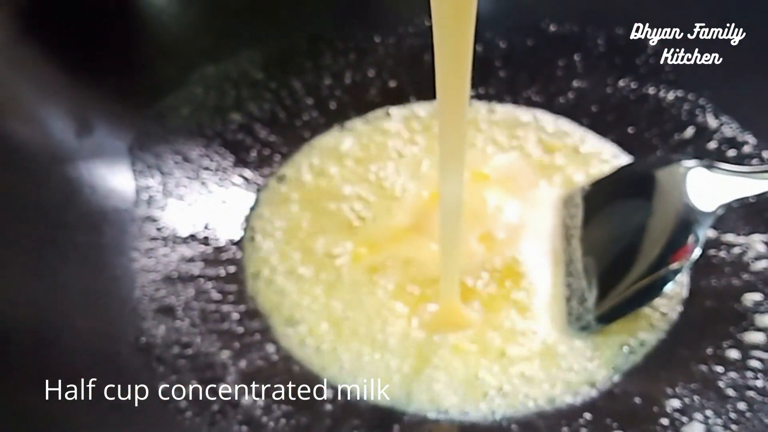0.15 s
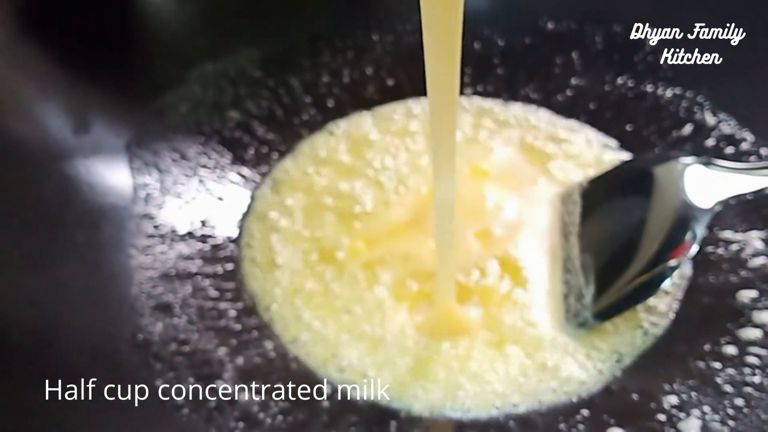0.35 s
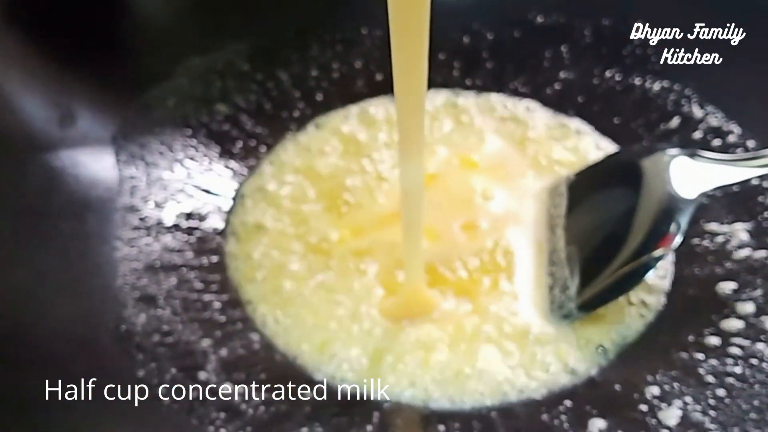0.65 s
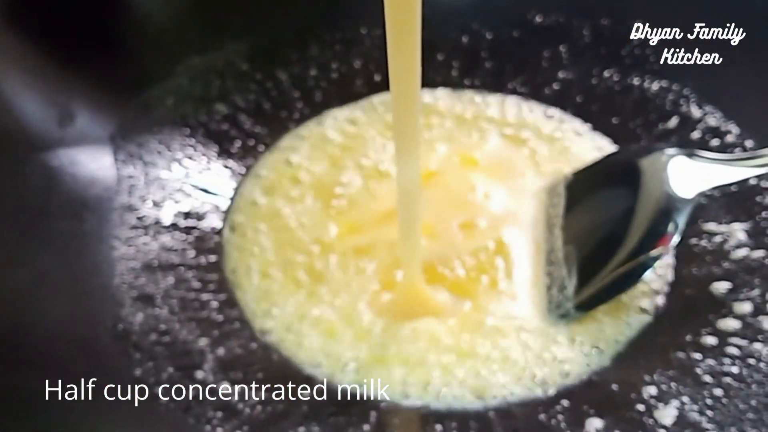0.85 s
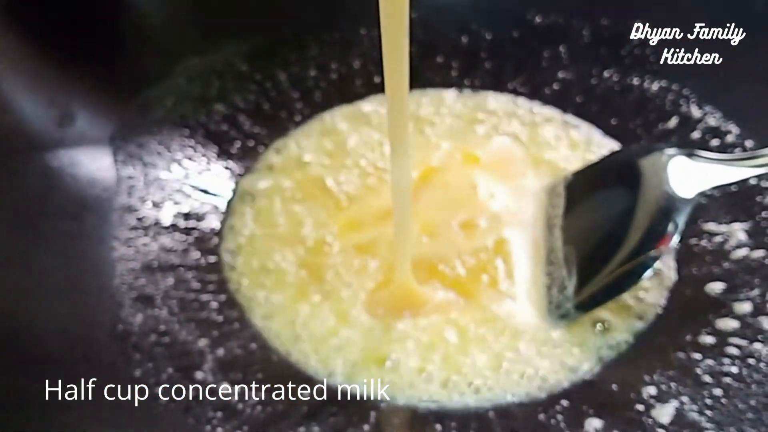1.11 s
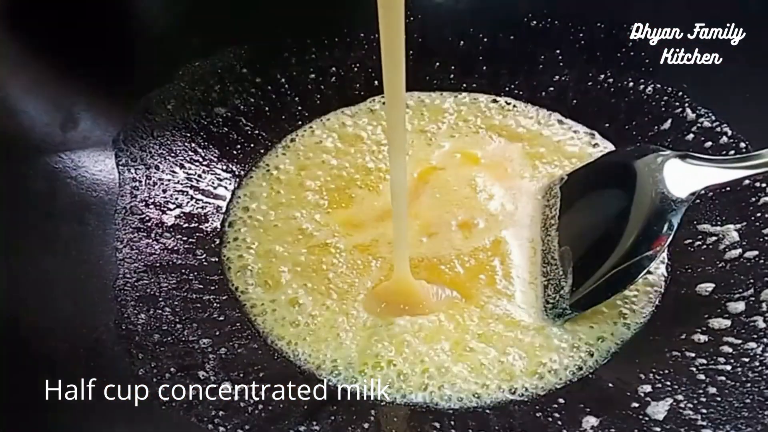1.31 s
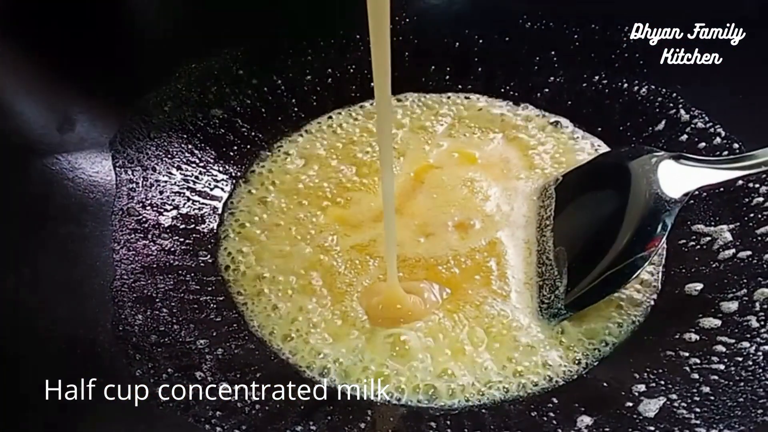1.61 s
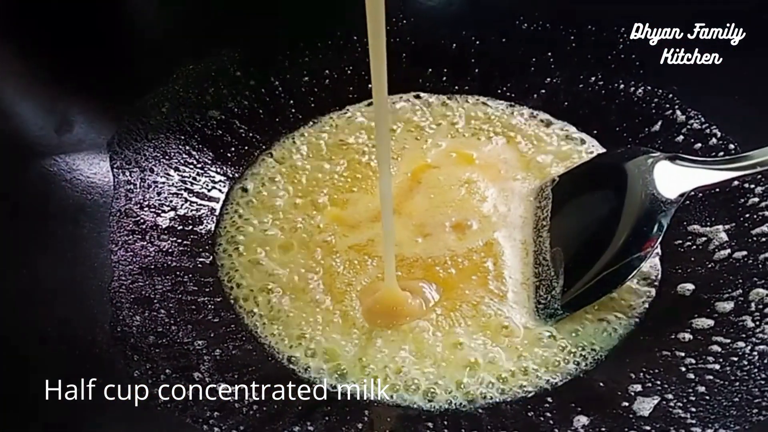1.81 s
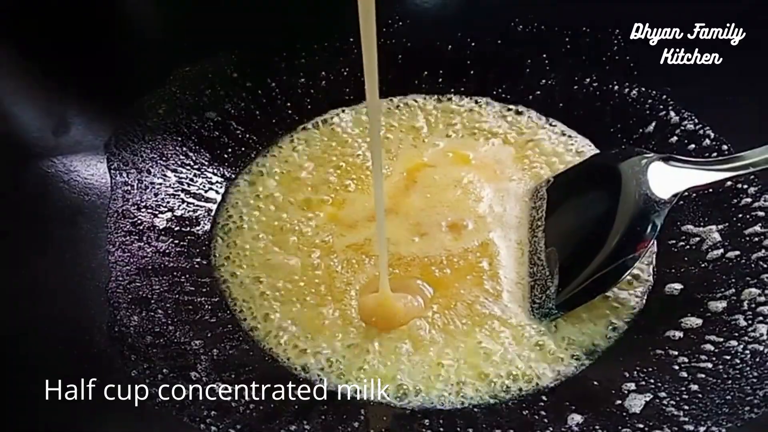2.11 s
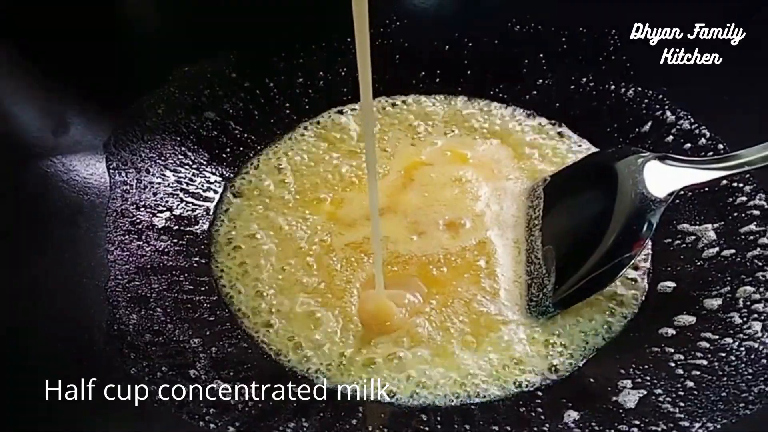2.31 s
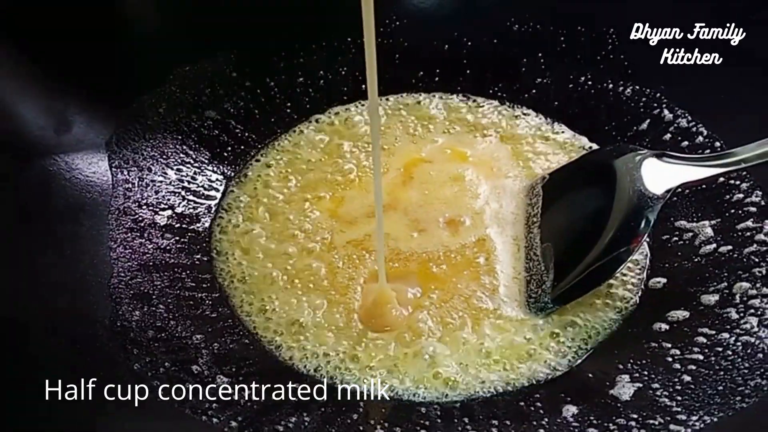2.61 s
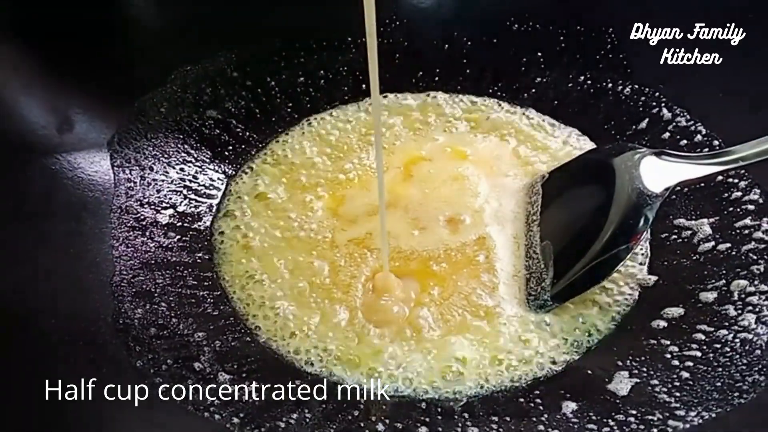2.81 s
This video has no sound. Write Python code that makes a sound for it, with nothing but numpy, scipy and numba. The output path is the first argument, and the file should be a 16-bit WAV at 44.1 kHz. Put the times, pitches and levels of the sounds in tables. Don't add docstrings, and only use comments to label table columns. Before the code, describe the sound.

Sizzling of foaming butter in a hot pan, fine fizzing hiss with sharp little pops

```python
import sys
import numpy as np
from scipy import signal
from scipy.fft import rfft, irfft, next_fast_len
from scipy.io import wavfile
from scipy.ndimage import uniform_filter1d
from numba import njit

SR = 44100
rng = np.random.default_rng(int(sys.argv[2]) if len(sys.argv) > 2 else 0)


def store_pcm(level_fs):
    pcm = np.round(np.clip(level_fs, -1, 1) * 32767).astype(np.int16)
    wavfile.write(sys.argv[1], SR, np.atleast_2d(pcm).T)


def attenuation_scalar(level_db):
    decades = np.asarray(level_db, float) / 20
    return 10 ** decades


N = 130095


def unit(x):
    return x / np.sqrt(np.mean(x ** 2))


def curve(table, hz):
    points = np.array(table, float)
    return np.interp(np.log(np.maximum(hz, 1)), np.log(points[:, 0]), points[:, 1])


def shape(x, gain):
    size = next_fast_len(N + 4096)
    hz = np.arange(size // 2 + 1) * SR / size
    return irfft(rfft(x, size) * gain(hz), size)[..., :N]


def walk(rate_hz):
    hold = max(int(SR / rate_hz), 2)
    steps = rng.standard_normal(N // 64 + 1)[np.arange(N) // hold]
    return unit(uniform_filter1d(steps, hold))


@njit
def ring(at, hz, cycles, size, phase, glide, count):
    out = np.zeros(count)
    for g in range(len(at)):
        tau = cycles[g] * SR / hz[g] / 2
        start, p = int(at[g] * SR - 1.6 * tau), phase[g]
        for k in range(int(5 * tau)):
            x = k / tau - 1.6
            p += 2 * np.pi * min(hz[g] * (1 + glide * x) / SR, .45)
            if 0 <= start + k < count:
                fade = 2 if x < 0 else 1 / (.6 + .5 * x)
                out[start + k] += size[g] * np.exp(-x * x * fade) * np.sin(p)
    return out


def paths(at, hz, cycles, size):
    echo_s, echo_smear, glide = .004, 2.2, .031
    u = rng.random((len(at), 5)).T
    smear = [1, echo_smear, echo_smear]
    late = [0, -echo_s * np.log(1 - u[3]), -echo_s * np.log(1 - u[4])]
    out = []
    for k in range(3):
        strength = size / np.sqrt(smear[k])
        out.append(ring(at + late[k], hz, cycles * smear[k] + 0 * hz, strength, 2 * np.pi * u[k], glide, N))
    return np.array(out)


# (time [s], level [dB])
HEAT = [(0, -41), (.34, -40.5), (.55, -38), (1.02, -35), (1.3, -35.5), (1.42, -38.5), (1.6, -35),
        (1.71, -35), (2.16, -35), (2.55, -35), (2.95, -34.5)]


def heat_db(t):
    return np.interp(t, *np.array(HEAT).T)


def heat_tilt_db(heat, octave):
    return 0.37 * octave * (heat - heat.max())


# (time [s], rise [dB], length [s], pitch [Hz])
SPURTS = [(0.034, -11, 0.052, 1670), (0.098, 6, 0.073, 9350), (0.145, 3.5, 0.082, 1720),
          (0.165, -5.5, 0.052, 9500), (0.225, 5.9, 0.028, 2410), (0.339, 5, 0.06, 2950),
          (0.363, 11, 0.045, 11400), (0.515, 8.5, 0.028, 9100), (0.588, 3.5, 0.092, 5900),
          (0.59, 4, 0.24, 1670), (0.673, -8, 0.035, 2970), (0.7, 9, 0.018, 11100),
          (0.746, -11, 0.011, 15000), (0.773, 5.5, 0.013, 7600), (0.774, 2.5, 0.14, 3400),
          (0.864, 11, 0.011, 11500), (0.887, -5, 0.06, 1740), (0.919, 8, 0.026, 8200),
          (1.027, 4, 0.043, 1700), (1.083, 2, 0.15, 6400), (1.241, 4.5, 0.037, 6300),
          (1.415, -7.5, 0.12, 2360), (1.416, -4, 0.012, 7600), (1.498, 1.5, 0.027, 12400),
          (1.511, 1, 0.028, 4270), (1.517, 6, 0.076, 2010), (1.567, -5, 0.02, 1980),
          (1.597, 12.5, 0.0067, 2420), (1.627, -20, 0.0084, 11100), (1.66, 12, 0.078, 1880),
          (1.69, 3, 0.067, 5300), (1.697, 6, 0.096, 11700), (2.005, -12, 0.027, 4230),
          (2.105, 11, 0.017, 9500), (2.135, -23, 0.0067, 5470), (2.226, -5, 0.049, 8060),
          (2.247, -3.5, 0.11, 3540), (2.305, 7, 0.038, 3600), (2.367, 12, 0.031, 1910),
          (2.38, 5, 0.1, 11400), (2.5, 7.5, 0.033, 11600), (2.519, 5, 0.038, 4900), (2.54, 10, 0.12, 1666),
          (2.644, 4, 0.038, 1700), (2.745, 6, 0.094, 2230), (2.902, -21.5, 0.014, 9100)]


def spurt_db(t, hz):
    share, width_octaves = 0.96, 0.57
    total = 0
    for start, db, length, centre in SPURTS:
        in_time = ((t - start) / (.5 * length)) ** 2
        in_pitch = (np.log2(hz / centre) / width_octaves) ** 2
        total = total + db * np.exp(-in_time - in_pitch)
    return share * total


def steam(heat):
    t, noise = np.arange(0, N, 32) / SR, rng.standard_normal((3, N))
    out = 0
    for hz in 1200 * 2 ** np.arange(0, 4, .5):
        db = np.repeat(spurt_db(t, hz), 32)[:N] + heat_tilt_db(heat, np.log2(hz / 7000))
        band = shape(noise, lambda f: np.clip(1 - 2 * np.abs(np.log2(f / hz + 1e-9)), 0, 1))
        out = out + attenuation_scalar(db) * band
    return attenuation_scalar(-6.5) * out


def foam():
    bubbles, cycles, level_db = 36000, 3.2, 4.5
    scatter_db, scatter_tilt_db, biggest = 3.6, .9, 3.6
    u = rng.random((bubbles, 3)).T
    at, hz = u[0] * N / SR, 1200 + 14800 * u[1]
    octave, i = np.log2(hz / 7000), (u[0] * N).astype(int)
    zones = np.array([walk(44.92) for _ in range(8)])
    shared = 1.57 * walk(60.2)
    heat = heat_db(np.arange(N) / SR)
    db = np.minimum(-np.log(1 - u[2]), biggest) * (scatter_db + scatter_tilt_db * octave)
    db = db + shared[i] + 2 * zones[(u[1] * 8).astype(int), i]
    db = db + spurt_db(at, hz) + 0.37 * octave * (heat - heat.max())[i]
    fizz = paths(at, hz, cycles, attenuation_scalar(db) * np.sqrt(hz))
    return (unit(fizz) + steam(heat)) * attenuation_scalar(level_db + heat)


# (pitch [Hz], level [dB per Hz])
KITCHEN = [(40, -14.5), (270, -7), (334, -7.5), (467, -9), (1060, -7), (1160, -11.5), (1500, -1.5),
           (1950, -24.5), (3300, -120)]


def kitchen():
    level_db, patchy_db, patch_s = -60.5, 5.5, .03
    out = np.zeros((2, N))
    for port in range(2):
        for hz in 45 * 1.5 ** np.arange(10):
            bell = lambda f: np.exp(-(np.log(f / hz + 1e-9) / 0.37) ** 2)
            band = shape(rng.standard_normal(N), lambda f: attenuation_scalar(curve(KITCHEN, f)) * bell(f))
            out[port] += band * attenuation_scalar(patchy_db * walk(1 / patch_s))
    return unit(out) * attenuation_scalar(level_db)


# (time [s], peak level [dB], pitch [Hz], half the left-right gap [dB])
LOW_TONES = [(0.154, -62, 315, -0.5), (0.369, -53.5, 988, 18), (0.386, -54, 594, 17), (0.491, -60, 308, 11),
             (0.505, -44.5, 106, 20), (0.534, -56, 314, 6), (0.569, -47, 107, 17), (0.575, -57.1, 302, 15),
             (0.723, -54.5, 1150, -20), (0.949, -61, 1100, 4), (0.99, -56.2, 1052, -8), (0.998, -62.6, 162, 1),
             (1.027, -52, 1050, -5), (1.027, -56.5, 893, 7), (1.054, -56.9, 1100, -2), (1.059, -59.5, 158, -1),
             (1.466, -60.5, 381, -2), (1.495, -63, 357, 3), (1.707, -62, 173, -13), (1.733, -60, 424, -17),
             (1.814, -60, 167, 5), (1.858, -64, 235, -17), (1.962, -63, 365, 3), (2.075, -57.5, 1259, 6),
             (2.177, -57, 637, 11), (2.27, -53.4, 329, 4), (2.328, -60.5, 346, -2), (2.386, -55.5, 366, 6),
             (2.392, -59, 1236, 4), (2.412, -53, 898, 11), (2.589, -62, 1250, 8), (2.647, -63.5, 215, -14),
             (2.775, -50.5, 1305, 8), (2.888, -53, 1273, 6), (2.911, -57, 1260, 6), (2.937, -56, 1278, 8)]


def low_tones():
    knock_s, tone_s, level_db = .012, .026, 6
    at, db, hz, pan_db = np.array(LOW_TONES, float).T
    cycles = hz * np.where(hz < 130, knock_s, tone_s)
    left = 1 / (1 + attenuation_scalar(-4 * pan_db))
    sides = [ring(at, hz, cycles, attenuation_scalar(level_db + db) * np.sqrt(w), 0 * at, 0., N) for w in (left, 1 - left)]
    return np.array(sides)


# (time [s], peak level [dB], pitch [Hz])
BRIGHT_POPS = [(0.5368, -20.0, 13500), (0.6078, -16.7, 14300), (0.6946, -17.9, 14300),
               (0.7007, -18.7, 11100), (0.7621, -9.7, 10300), (0.7789, -16.2, 14200),
               (0.8615, -12.8, 11400), (0.9194, -16.6, 14400), (0.9513, -21.4, 10800),
               (0.9873, -15.7, 14100), (1.0057, -13.8, 14600), (1.0427, -16.5, 10800),
               (1.0447, -16.6, 14400), (1.0527, -16.5, 14000), (1.1161, -13.9, 14200),
               (1.1436, -17.7, 10400), (1.1838, -14.0, 14000), (1.2067, -18.9, 10500),
               (1.2286, -14.6, 13900), (1.3087, -21.4, 11200), (1.4651, -18.1, 14700),
               (1.4882, -17.0, 13900), (1.4885, -15.4, 11600), (1.5624, -17.5, 13500),
               (1.5625, -18.7, 11600), (1.6734, -5.1, 14500), (1.682, -13.8, 14100), (1.8288, -16.9, 13500),
               (1.8548, -19.6, 11900), (1.8752, -19.9, 10700), (2.1084, -17.9, 11600),
               (2.1801, -14.6, 14700), (2.3008, -17.0, 14100), (2.3405, -21.3, 11800),
               (2.4224, -15.7, 13900), (2.4226, -16.6, 11700), (2.4571, -17.2, 14500),
               (2.4985, -15.6, 14300), (2.5019, -13.0, 14700), (2.5062, -16.1, 14700),
               (2.6583, -14.8, 14300), (2.706, -20.9, 10800), (2.7395, -18.8, 11500),
               (2.7976, -19.0, 10900)]
# (time [s], peak level [dB], pitch [Hz])
DULL_POPS = [(0.2985, -23.9, 6000), (0.4343, -23.5, 6200), (0.5216, -18.5, 6900), (0.5256, -23.0, 7300),
             (0.5474, -24.1, 6600), (0.5477, -25.6, 5000), (0.5796, -22.7, 7400), (0.5874, -20.7, 6500),
             (0.5922, -20.8, 6900), (0.7004, -22.4, 6700), (0.7341, -24.4, 4900), (0.762, -15.9, 8500),
             (0.9062, -22.0, 8700), (0.9099, -21.7, 7800), (0.9693, -23.8, 5200), (0.9878, -22.3, 6800),
             (1.1581, -23.0, 7200), (1.1893, -22.7, 6600), (1.1955, -19.7, 6500), (1.2064, -17.3, 7900),
             (1.2287, -20.5, 7300), (1.3085, -22.4, 6700), (1.321, -20.2, 6400), (1.3505, -23.7, 6700),
             (1.4508, -23.1, 7200), (1.5372, -22.5, 7100), (1.5411, -22.0, 7000), (1.6421, -23.3, 2700),
             (1.6824, -25.7, 5200), (1.6824, -12.4, 6600), (1.7161, -21.8, 7500), (1.8958, -25.9, 5300),
             (1.9144, -23.2, 6500), (2.4824, -25.7, 5400), (2.4824, -17.7, 6200), (2.5087, -26.6, 5100),
             (2.5087, -21.3, 6500), (2.5224, -21.8, 4900)]


def pops():
    at, db, hz = np.array(list(BRIGHT_POPS) + list(DULL_POPS), float).T
    return paths(at, hz, 4.5 * np.sqrt(hz / 12000), attenuation_scalar(4 + db - curve(LEFT_PORT, hz)))


# (pitch [Hz], level [dB])
LEFT_PORT = [(1150, -15), (2000, -3), (3050, -1), (4300, -2.5), (5800, 1.5), (7600, -1), (9200, -4.5),
             (14900, 2.5)]
# (pitch [Hz], level [dB])
RIGHT_PORT = [(1150, -26.5), (2000, -3.5), (2900, 5), (5400, -3), (7800, 8), (9600, -7), (12000, -5),
              (14900, -11)]
# (pitch [Hz], share [0-1])
DIRECT = [(2500, 0.07), (4800, 0.03), (7000, 0.29), (8300, 0.96), (11000, 0.25), (15000, 0.35)]


def ports(direct, echo_left, echo_right):
    left_wet, right_db = 0.32, -3.5

    def colour(table):
        return lambda f: attenuation_scalar(curve(table, f) - 60 * np.clip(np.log2(1150 / (f + 1)), 0, 3))

    share = lambda f: np.clip(curve(DIRECT, f), 0, .98)
    left = shape(direct + left_wet * echo_left, colour(LEFT_PORT))
    right = shape(direct, share) + shape(echo_right, lambda f: np.sqrt(1 - share(f) ** 2))
    return np.array([left, attenuation_scalar(right_db) * shape(right, colour(RIGHT_PORT))])


def scene():
    return ports(*(foam() + pops())) + kitchen() + low_tones()


# (pitch [Hz], level [dB])
STARVE = [(100, -26), (900, -22), (1400, -13), (2300, -21), (9300, -12), (15000, -17)]
# (centre time [s], length [s])
GAPS = [
    [(.86, .16), (1.09, .03), (1.29, .17), (1.58, .1), (2.77, .22)],
    [(1.125, .06), (1.93, .05)],
]


def starve(x):
    spread_db, zone_spread_db = 2, 4.5
    gap_db, gap_top_hz = 14, 1550
    mono_low_hz, mono_high_hz, mono_below_db, mono_span_db = 6400, 10500, -33, 17
    window = np.sin(np.pi * (np.arange(2048) + .5) / 2048)
    hz, t, z = signal.stft(x, SR, window=window, nperseg=2048)
    loud = np.sqrt(np.mean(np.abs(z) ** 2, axis=1, keepdims=True))
    zone = (np.sqrt(hz) / 3).astype(int)
    mood = spread_db * rng.standard_normal(loud.shape)
    mood = mood + zone_spread_db * rng.standard_exponential((2, 64, z.shape[2]))[:, zone]
    gaps = np.array([sum(np.abs(t - s) < length / 2 for s, length in port) for port in GAPS])
    mood = mood + gap_db * gaps[:, None] * (hz < gap_top_hz)[:, None]
    ratio = np.abs(z) / (loud * attenuation_scalar(curve(STARVE, hz)[:, None] + mood) + 1e-12)
    odds = (mono_below_db - heat_db(t)) / mono_span_db
    draw = rng.random((64, len(t)))[zone // 2][:, np.arange(len(t)) // 2]
    mono = (draw < odds) & ((hz > mono_low_hz) & (hz < mono_high_hz))[:, None]
    z = z * (ratio > 1)
    z = np.where(mono, z.mean(axis=0), z)
    return signal.istft(z, SR, window=window, nperseg=2048)[1][:, :N]


def top_cut(x):
    top_hz = 15460
    step_db = lambda f: np.clip((f - top_hz) / 80, 0, 1) * 8.2
    slope_db = lambda f: np.clip((f - top_hz) / 1000, 0, 2) * 20
    return shape(x, lambda f: attenuation_scalar(-step_db(f) - slope_db(f)))


def band_limit(x):
    return signal.sosfilt(signal.butter(12, 16780, fs=SR, output="sos"), x)


def record(dry):
    mix = starve(top_cut(dry))
    return band_limit(mix)


dry = scene()
out = record(dry)
store_pcm(out)
```